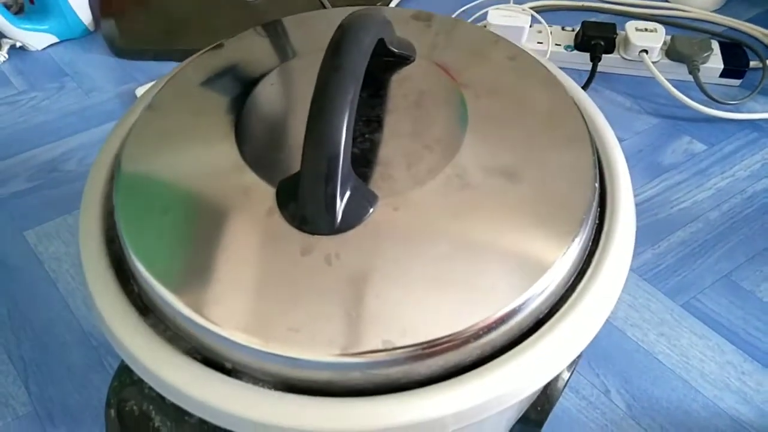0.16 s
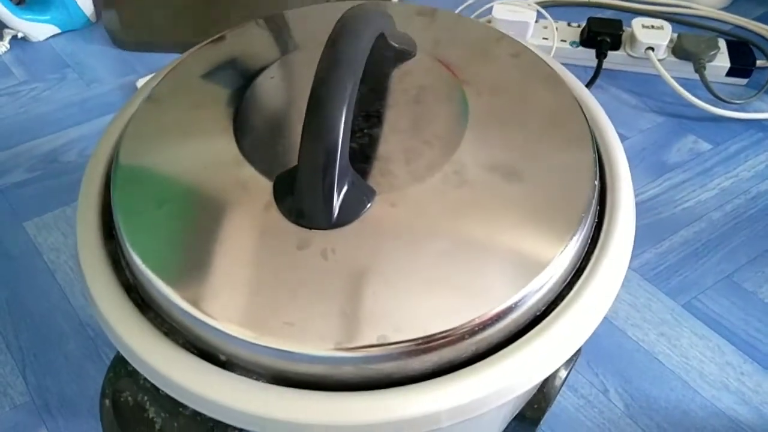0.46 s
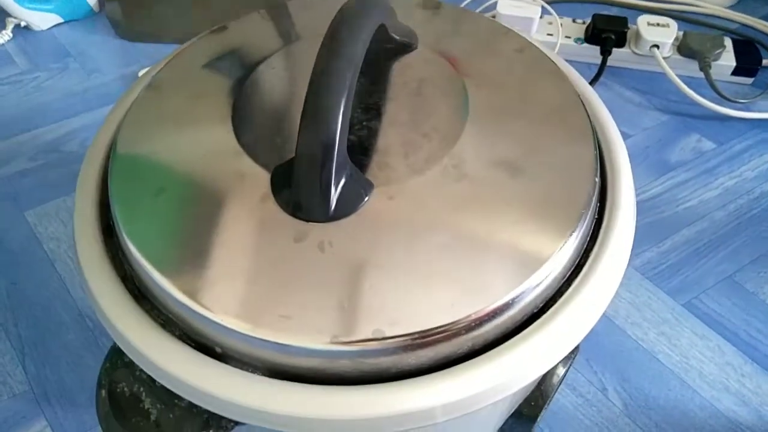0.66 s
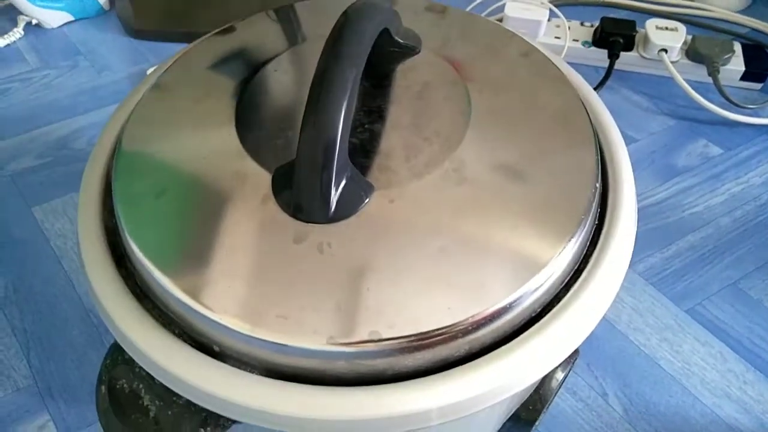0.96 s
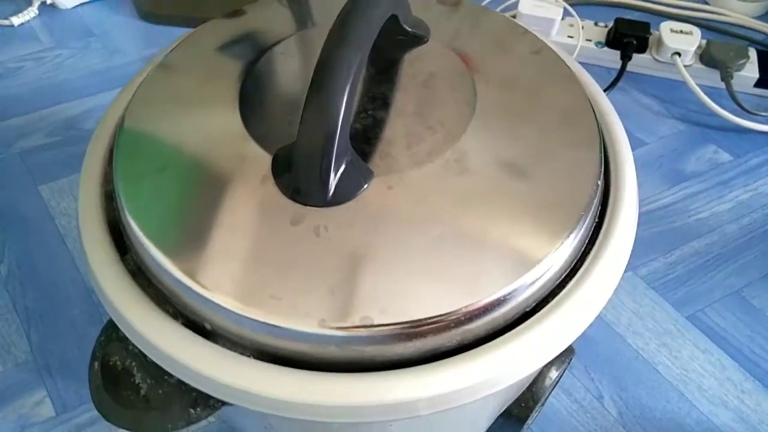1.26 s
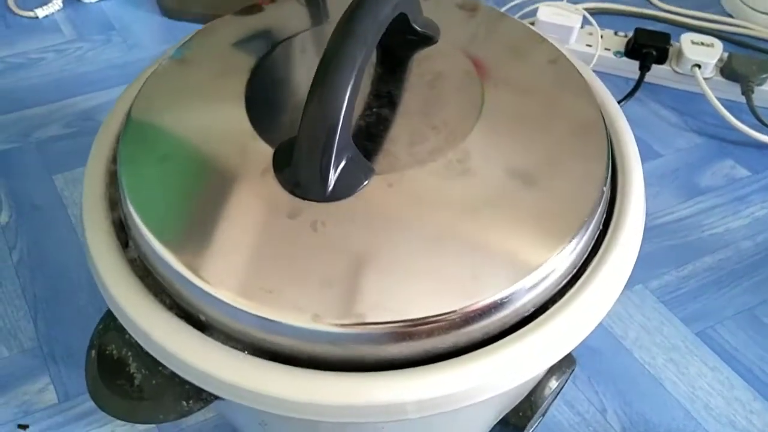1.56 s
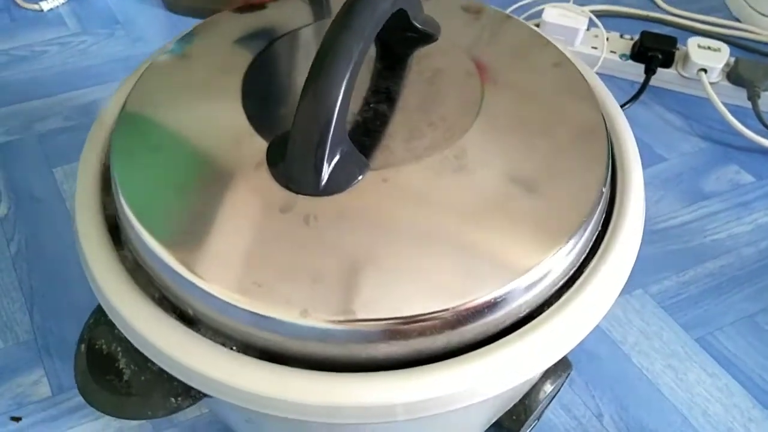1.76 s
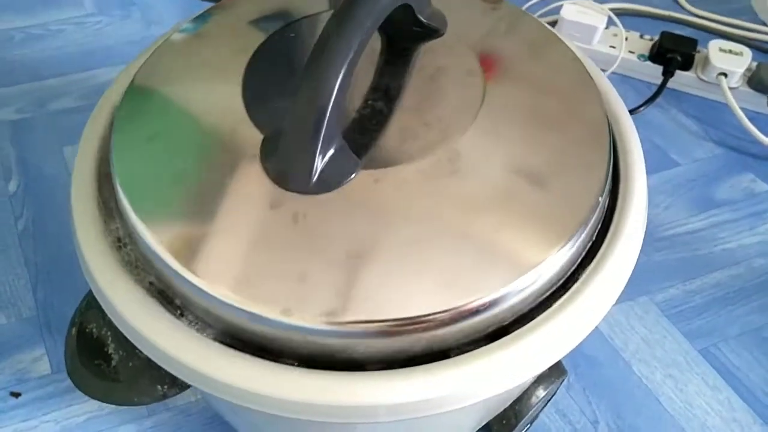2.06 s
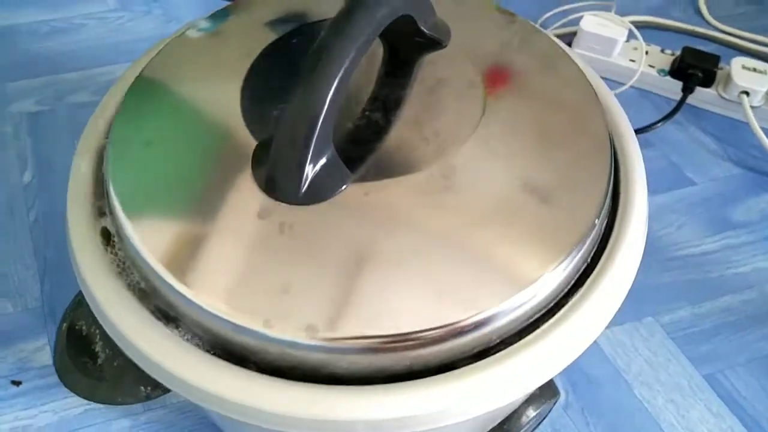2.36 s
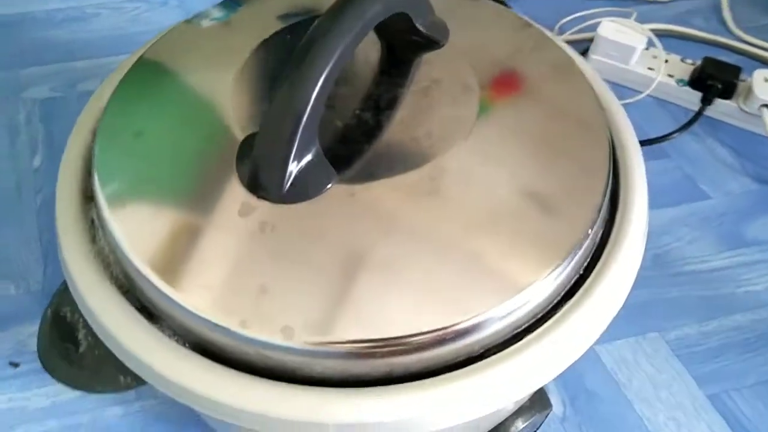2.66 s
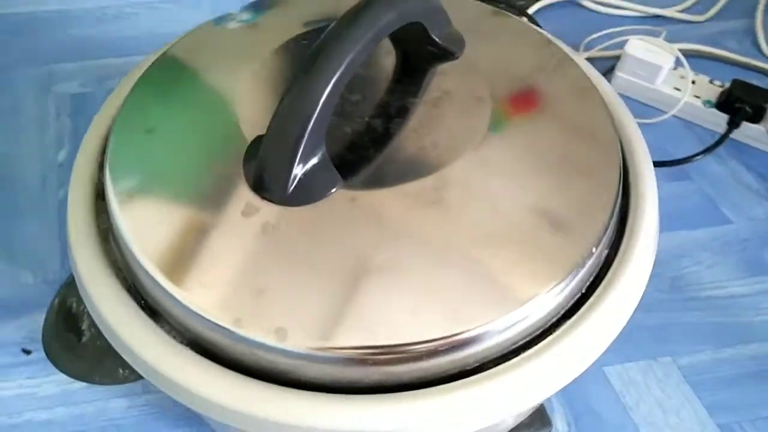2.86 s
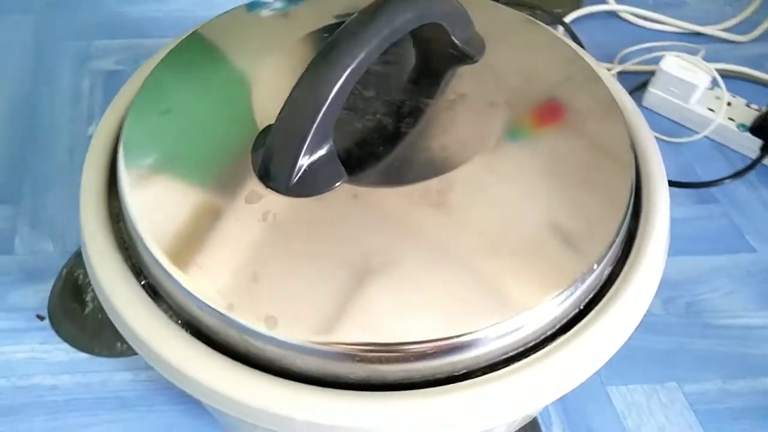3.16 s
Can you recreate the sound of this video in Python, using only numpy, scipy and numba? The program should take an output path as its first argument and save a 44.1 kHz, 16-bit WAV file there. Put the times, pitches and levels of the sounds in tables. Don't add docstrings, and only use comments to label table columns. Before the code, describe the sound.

A rice cooker boils close up in a kitchen: sparse lid ticks and soft plops first, then faster rattling with one hard metallic clank, easing again over low hum and faint hiss.

```python
import sys
import numpy as np
from scipy import signal
from scipy.fft import rfft, irfft
from scipy.io import wavfile
from scipy.ndimage import uniform_filter1d
from numba import njit

SR = 44100
rng = np.random.default_rng(int(sys.argv[2]) if len(sys.argv) > 2 else 0)


def volts(x):
    e = np.asarray(x, float) / 20
    return 10 ** e


def persist_wave(psi):
    counts = np.round(np.clip(psi, -1, 1) * 32767).astype(np.int16)
    wavfile.write(sys.argv[1], SR, np.atleast_2d(counts).T)


N = 145530

# (time [s], rim ring [dB], pot [dB], dome [dB], sheet shimmer [dB])
TICKS = [(0.0597, -46.5, -46.5, -60, -93), (0.3362, -30.5, -46, -40.5, -69.5),
         (0.3655, -28, -42, -47.5, -96), (0.5606, -40, -78, -58, -102), (0.907, -29.5, -44.5, -41.5, -75),
         (0.969, -32.5, -49.5, -68, -100), (0.9847, -37, -46, -45.5, -101), (1.157, -52.5, -87, -70, -95),
         (1.278, -39, -50, -85, -97), (1.397, -41, -50, -58, -92), (1.537, -36, -52.5, -51.5, -90.5),
         (1.7045, -35, -49.5, -81, -72), (1.7199, -27.5, -39, -43.5, -77), (1.7793, -37, -43, -54, -83),
         (1.8237, -45, -38.5, -54, -80), (1.839, -25.5, -39.5, -40.5, -69.5),
         (1.9176, -37, -46, -46.5, -107), (1.9997, -29.5, -72, -45, -90),
         (2.0209, -29, -34.5, -41.5, -70.5), (2.0712, -30.5, -83, -45, -95),
         (2.1089, -12.5, -26, -31.5, -40), (2.1991, -33, -43, -43, -62),
         (2.2612, -23.5, -32.5, -41.5, -48.5), (2.3061, -31.5, -44.5, -39.5, -84),
         (2.4591, -30, -44, -45.5, -71), (2.5074, -30.5, -50, -49.5, -77), (2.561, -46, -48, -49, -95),
         (2.6025, -33.5, -47, -58, -93), (2.7826, -27, -38, -42, -65.5), (2.8742, -37.5, -45.5, -48.5, -98),
         (2.9692, -36.5, -53, -50, -96), (3.0609, -40, -62, -59.5, -90), (3.1284, -33, -52, -53.5, -89),
         (3.2013, -47, -88, -60, -93)]
# (time [s], level [dB])
BOIL = [(0.0, -55), (.3, -57), (.6, -58), (.95, -65), (1.15, -64.5), (1.4, -58), (1.65, -52.5), (1.8, -40),
        (2.05, -43.5), (2.3, -40.5), (2.72, -52.5), (3.3, -61)]
STEADY_T60_S = 0.6


def curve(x, table):
    return np.interp(x, *np.array(table, float).T[:2])


def coloured(table):
    hz, db = np.array(table, float).T
    log_f = np.log(np.arange(N // 2 + 1) * SR / N + 1)
    gain = volts(np.interp(log_f, np.log(hz), db, -120, -120))
    x = irfft(rfft(rng.standard_normal(N)) * gain, N)
    return x / x.std()


def band(hz, width):
    f = np.arange(N // 2 + 1) * SR / N
    x = irfft(rfft(rng.standard_normal(N)) / (1 + (2 * (f - hz) / width) ** 2), N)
    return x / x.std()


def walk(rate):
    k = int(SR / rate)
    steps = np.repeat(rng.standard_normal(N // k + 1), k)
    return uniform_filter1d(uniform_filter1d(steps, k), k)[:N]


def smear(t60):
    t = np.arange(SR // 4) / SR
    echo = rng.standard_normal(len(t)) * volts(-60 * t / t60)
    return echo / np.sqrt(np.sum(echo ** 2))


@njit
def ring(out, at, gains, poles, damp, shake):
    for m in range(len(poles)):
        z, k = 0j, 0
        for i in range(at[0], len(out)):
            z *= poles[m] * damp[i] * shake[m, i >> 8]
            while k < len(at) and at[k] <= i:
                z += gains[k, m]
                k += 1
            out[i] += z.imag
    return out


@njit
def grains(out, at, turn, glide, fade, size):
    for g in range(len(at)):
        z, p, i = size[g] + 0j, fade[g] * np.exp(1j * turn[g]), at[g]
        r = np.exp(1j * glide[g])
        while i < len(out) and abs(z) > size[g] / 500:
            out[i] += z.imag
            z *= p
            p *= r
            i += 1
    return out


def tones(s, hz, t60, db, rise):
    turn = 2 * np.pi * hz / SR
    glide = turn * rise / (t60 * SR)
    fade = np.exp(-np.log(1000) / (t60 * SR))
    return grains(np.zeros(N), (s * SR).astype(np.int64), turn, glide, fade, volts(db))


def split(modes):
    m = np.array(modes, float)
    near = np.repeat(m, 2, axis=0)
    near[:, 0] *= 1 + 0.03 * rng.standard_normal(len(near))
    near[:, 1] = (near[:, 1] - 4).clip(-99, -8)
    near[:, 2] = near[:, 2].clip(0, 0.5) * 0.75
    return np.r_[m, near]


def struck(modes, times, db, patch_db=0, colour_db=0):
    settles = [.635, 1.21, 2.675, 3.25]
    settle_s, settle_db = 0.025, -12
    strike_spread_db = 4.5
    wander = 0.5

    hz, mode_db, t60 = np.array(modes, float).T
    order = np.argsort(times)
    share = volts(mode_db) / np.sqrt(np.sum(volts(mode_db) ** 2))
    loose = t60 < STEADY_T60_S
    chance = rng.standard_normal((len(times), 3, len(hz)))
    patch = 4 * patch_db * uniform_filter1d(chance[:, 2], size=16, axis=1)
    level = db[:, None] + strike_spread_db * chance[:, 0] * loose + patch + colour_db
    gains = volts(level) * share * np.exp(2j * np.pi * chance[:, 1])

    poles = np.exp(2j * np.pi * hz / SR - np.log(1000) / (t60 * SR))
    unrest = wander / 256 * loose * np.sqrt(hz / 1500).clip(1)
    shake = np.exp(1j * unrest[:, None] * rng.standard_normal((len(hz), N // 256 + 1)))
    t = np.arange(N) / SR
    settling = sum((t > s) & (t < s + settle_s) for s in settles)
    damp = volts(settling * settle_db / (settle_s * SR))
    at = (times[order] * SR).astype(np.int64)
    return ring(np.zeros(N), at, gains[order], poles, damp, shake)


def bursts(column, t60, colour):
    ticks = np.array(TICKS)
    hits = np.zeros(N)
    hits[(ticks[:, 0] * SR).astype(int)] = volts(ticks[:, column])
    return signal.lfilter([1], [1, -volts(-60 / (t60 * SR))], hits) * coloured(colour)


def kitchen_hum(t):
    # (centre [Hz], width [Hz], level [dB rms])
    hum_bands = [(55.4, 8.5, -48.5), (95.45, 1.57, -48.5), (109.4, 11.2, -49), (179.9, 16.4, -49),
                 (230.6, 145, -51.5)]
    # (time [s], level [dB])
    swell = [(1.6, 0), (1.76, 4), (2.08, 4), (2.18, -1), (2.55, 3), (2.9, -1)]
    return sum(volts(db + curve(t, swell) + 3.54 * walk(4.23)) * band(hz, w) for hz, w, db in hum_bands)


def room_rumble():
    # (frequency [Hz], density [dB per Hz])
    spectrum = [(12, -35), (20, -9), (114, 13), (610, -14), (927, -37), (1600, -34), (1740, -34),
                (1970, -29.5), (3000, -45), (3900, -56), (6600, -120)]
    return volts(-44 + 0.5 * walk(9.0)) * coloured(spectrum)


def air_hiss(t):
    # (frequency [Hz], density [dB per Hz])
    spectrum = [(1180, -42), (2000, 5), (2420, -0.5), (3620, -10.5), (5670, -7), (7800, -13.5),
                (15700, -13)]
    hiss_db, wakes_s = -74.5, 2.1
    side_db = hiss_db - 18 - 12 * (t < wakes_s)
    side = volts(side_db) * coloured([(3000, -7), (6000, -2), (9000, -4), (15700, 2)])
    return volts(hiss_db) * coloured(spectrum), side


def plops():
    # (time [s], level [dB], pitch [Hz])
    big_bubbles = [(.003, -46, 1744), (.062, -33, 1493), (.11, -34, 1493), (.06, -50, 950),
                   (1.371, -33, 404), (0.552, -46, 1203), (1.351, -46.5, 1320), (.128, -36.5, 684),
                   (.128, -37, 492), (.20, -36, 610), (.26, -42, 626), (.46, -38, 1510), (.8, -38, 420),
                   (.98, -59, 965), (1.365, -44.5, 629), (1.46, -53, 1350), (.28, -53, 1590),
                   (.478, -52, 560), (.50, -45, 778), (.688, -38.5, 583), (.69, -47, 1520),
                   (.78, -49, 1475), (.80, -48, 1900), (1.51, -39.5, 770), (1.605, -33.5, 2043),
                   (1.62, -41, 1035), (1.785, -28, 612), (1.80, -33.5, 751), (1.86, -35, 560),
                   (1.9, -39, 841), (1.82, -32, 1446), (2.445, -39, 613), (2.493, -39.5, 836),
                   (2.54, -37.5, 635.5), (2.596, -43, 630), (2.70, -42.5, 1513), (2.79, -37, 1309),
                   (2.964, -41, 536), (3.048, -48.5, 804), (3.12, -45, 977), (2.645, -41.5, 1012),
                   (2.869, -42, 802), (3.065, -26.5, 2090), (3.05, -21, 2300), (3.27, -43.5, 937)]
    t60, rise, swell_ratio = 0.24, 0.024, 39
    s, db, hz = np.repeat(np.array(big_bubbles, float), 5, axis=0).T
    chance = rng.standard_normal((len(s), 2)).T
    s = s + 0.005 * chance[1] ** 2
    hz = hz * (1 + 0.028 * chance[0])
    t60 = np.full(len(s), t60)
    fading = tones(s, hz, t60, db - 14, rise)
    return fading - tones(s, hz, t60 / swell_ratio, db - 14, rise / swell_ratio)


def bubbles():
    centre_hz, spread_octaves, cycles = 560, 0.453, 5.66
    u, e = rng.random((550, 2)).T
    hz = centre_hz * 2 ** (spread_octaves * rng.standard_normal(len(u))).clip(0.4, 4)
    s = u * N / SR
    db = curve(s, BOIL) - 2.5 - 5.5 * np.log(e).clip(-2.6)
    db = db - 5 * np.log2(hz / centre_hz).clip(0)
    return tones(s, hz, 2 * cycles / hz, db, 0.27)


def lid():
    # (frequency [Hz], level [dB], t60 [s])
    pot_modes = [(240.7, -5.5, 0.6), (340, -18.5, 0.057), (411.4, -1.5, 0.23), (460.6, -8.5, 0.36),
                 (560, 7.5, 0.078), (633, -5.5, 0.72), (770, -6.5, 0.26), (810, 0, 0.8), (951, -7.5, 0.27),
                 (1028, -6.5, 0.62)]
    # (frequency [Hz], level [dB], t60 [s])
    dome_modes = [(1100, -10, .22), (1170, -9, .22), (1230, -4, .45), (1305, -5, .3), (1384, -6, .3),
                  (1463, -6, .4), (1528, 6, 1.2), (1600, -11, .3)]
    # (frequency [Hz], level [dB], t60 [s])
    rim_modes = [(1685, -5, .33), (1705, -3, .33), (1722, 0, .4), (1748, -1, .33), (1762, 0, .35),
                 (1775, 0, .4), (1792, -2, .33), (1815, -3, .3), (1832, -5, .3), (1849, -3, .35),
                 (1875, -9, .22), (1898, -14, .2), (1960, -22, .12)]
    free_ring_db = -17

    s, rim, pot, dome, _ = np.array(TICKS, float).T
    place, strength = rng.random((110, 2)).T
    chatter = place * N / SR
    boil = curve(chatter, BOIL) - np.mean(BOIL, axis=0)[1]
    soft = -69 + np.log(strength).clip(-2) + 0.48 * boil
    times = np.r_[s, chatter]
    light = np.r_[rim < rim.max(), soft < 0][:, None]

    def part(modes, tick_db, chatter_db):
        long_ring = modes[:, -1] > STEADY_T60_S
        return struck(modes, times, np.r_[tick_db, soft + chatter_db], colour_db=free_ring_db * light * long_ring)

    return (part(np.array(rim_modes), rim - 6, 0)
            + part(split(pot_modes), pot - 1, -2)
            + part(split(dome_modes), dome + 5, -3))


def knock():
    return volts(-4.5) * bursts(column=2, t60=0.11, colour=[(300, -13), (480, 2.5), (1300, -13)])


def pot_body(water, metal):
    wet = volts(-6) * signal.fftconvolve(water, smear(0.18))[:N]
    return signal.sosfilt(signal.cheby2(8, 45, 2350, fs=SR, output="sos"), metal + water + wet)


def crack():
    return volts(-10) * bursts(column=4, t60=0.037, colour=[(5800, -16), (6600, 6), (12500, -11)])


def shimmer():
    # (frequency [Hz], level [dB])
    outline = [(2250, -20), (2750, -13), (3350, -27), (4650, -15), (5050, -24), (5500, -5), (6500, 0),
               (13500, -22)]
    # (frequency [Hz], level [dB], t60 [s])
    sheet_modes = [(2309, -9, .3), (2466, -2, .25), (2751, -6, .3), (3198, -15, .3), (3634, -14, .25),
                   (4200, -12, .4), (4500, -6, .45), (4650, -5, .3), (5389, 0, .45), (6013, -1, .4)]

    s, db = np.array(TICKS, float).T[[0, 4]]
    hz = np.linspace(2250, 13600, 420) + 9 * rng.standard_normal(420)
    t60 = 0.43 * (hz / 6000).clip(1) ** -0.75 * volts(rng.standard_normal(len(hz)))
    outline_hz, outline_db = np.array(outline, float).T
    dense = np.c_[hz, np.interp(np.log(hz), np.log(outline_hz), outline_db), t60]

    soft = db[:, None] < -57
    colour = 12 / (1 + ((hz - 7200) / 250) ** 2) + 22 * np.log2(hz / 8000)
    x = struck(dense, s, db - 0.5, 3 * soft + 4.5, colour * soft)
    x = np.convolve(x, np.hanning(5) / 2)[:N]
    clear = struck(split(sheet_modes), s, db - 9.5 - 20 * soft[:, 0])
    x = x + np.convolve(clear, np.hanning(9) / 2)[:N]

    x = signal.fftconvolve(x, smear(0.041))[:N]
    top = signal.sosfilt(signal.butter(6, 8000, "high", fs=SR, output="sos"), x)
    return x, volts(-7) * np.roll(top, 40)


def spits():
    # (time [s], level [dB], pitch [Hz])
    droplets = [(.283, -70, 11000), (1.665, -74, 6400), (2.74, -72, 4950), (2.785, -67, 5600),
                (2.83, -72, 5600), (.34, -68, 5250), (1.72, -68, 6350), (1.735, -73, 5300),
                (1.84, -68, 6300), (1.85, -76, 3800), (2.02, -73, 5650), (2.28, -66, 3300),
                (2.28, -63, 4450), (2.33, -67, 4450), (.338, -70, 10600), (.34, -71, 8700),
                (.908, -73, 9000)]
    s, db, hz = np.repeat(np.array(droplets, float), 4, axis=0).T
    chance = rng.standard_normal((len(s), 2)).T
    s = s + 0.008 * abs(chance[1])
    hz = hz * (1 + 0.015 * chance[0])
    return np.convolve(tones(s, hz, np.full(len(s), 0.1), db, 0.01), np.hanning(5) / 2)[:N]


def thump(t):
    start_s, length_s, hz = 1.975, 0.075, 78
    u = ((t - start_s) / length_s).clip(0, 1)
    return volts(-32) * np.sin(np.pi * u) ** 2 * np.sin(2 * np.pi * hz * (t - start_s))


def steam(t):
    # (centre [Hz], width [Hz], level [dB])
    gap_bands = [(5220, 54, -11), (6060, 120, 6), (6630, 150, 0), (6820, 55, 0), (7360, 150, -1.5),
                 (8600, 1200, -8), (10400, 1800, -2)]
    start_s, rise_s, hold_s, fall_s = 2.39, 0.06, 0.08, 0.11
    end_s = start_s + rise_s + hold_s + fall_s
    shape = np.minimum((t - start_s) / rise_s, (end_s - t) / fall_s).clip(0, 1)
    jet = sum(volts(db + 2.9 * walk(29.2)) * band(hz, w) for hz, w, db in gap_bands)
    return volts(-71) * shape ** 2 * jet


def scene():
    t = np.arange(N) / SR
    hiss, hiss_side = air_hiss(t)
    room = kitchen_hum(t) + room_rumble() + hiss
    pot = pot_body(plops() + bubbles(), lid() + knock())
    high, high_side = shimmer()
    mid = room + pot + crack() + high + spits() + thump(t) + steam(t)
    side = high_side + hiss_side
    return np.array([mid + side, mid - side])


def top_cut(x):
    return signal.sosfilt(signal.butter(12, 15810, fs=SR, output="sos"), x)


def record(dry):
    return top_cut(dry)


dry = scene()
out = record(dry)
persist_wave(out)
```